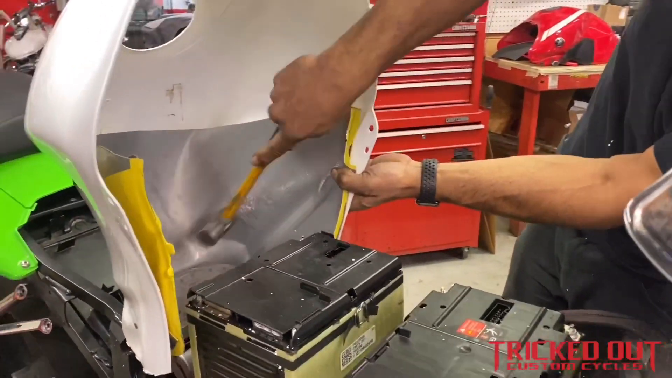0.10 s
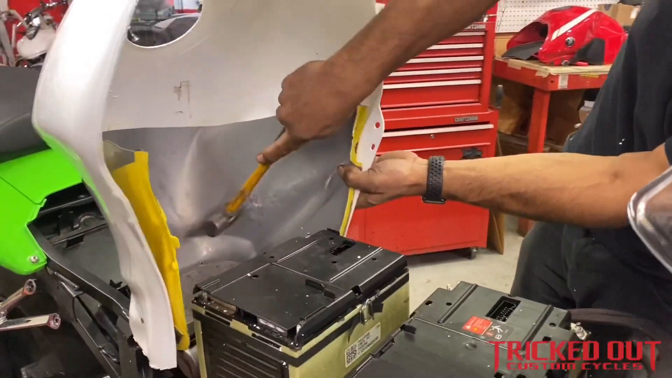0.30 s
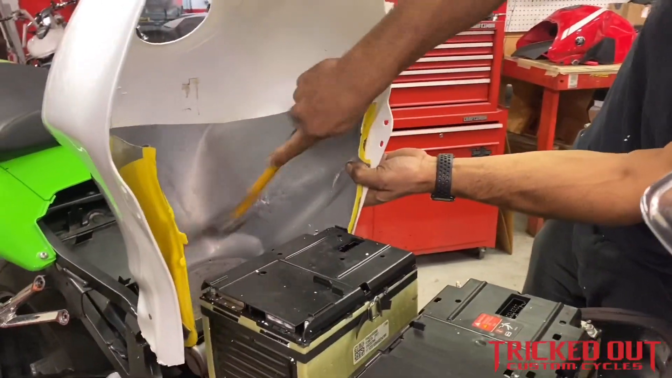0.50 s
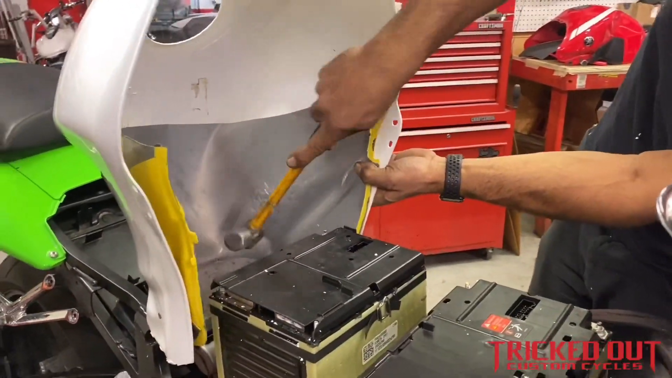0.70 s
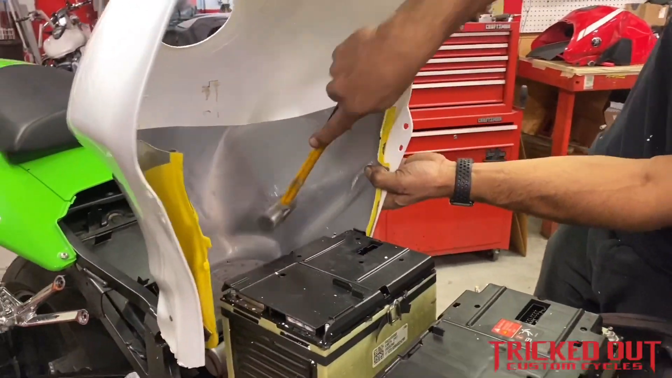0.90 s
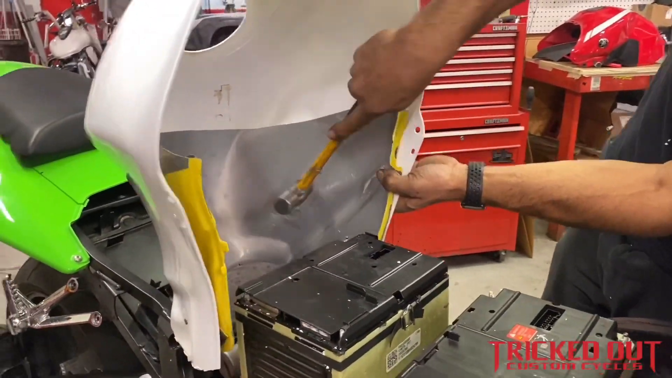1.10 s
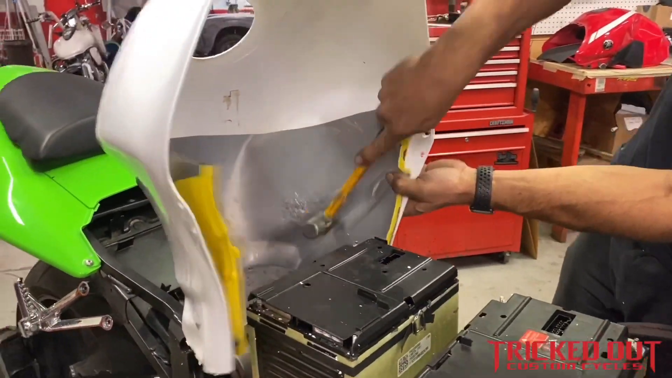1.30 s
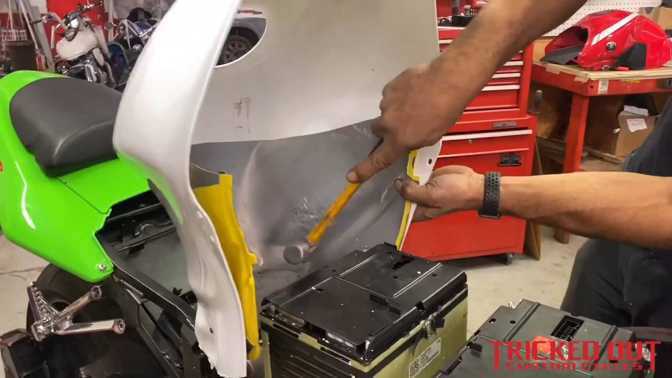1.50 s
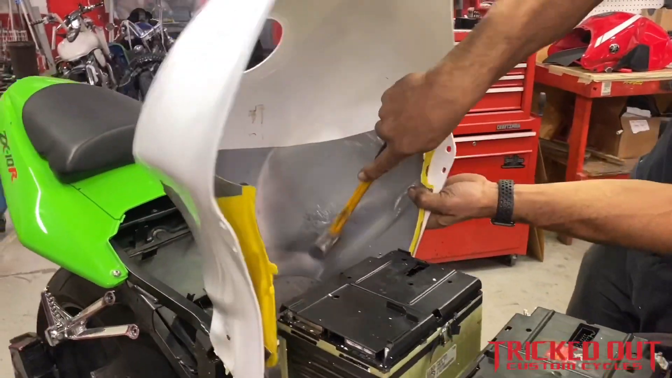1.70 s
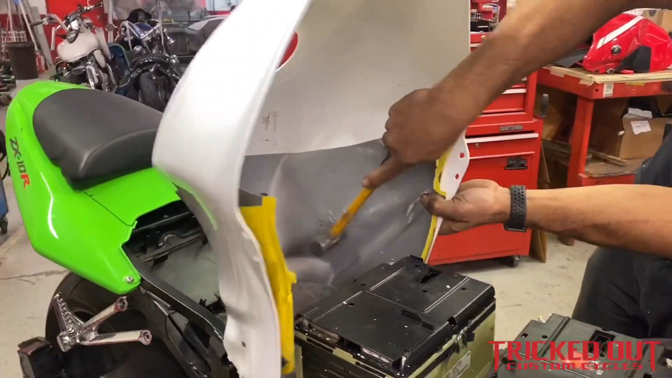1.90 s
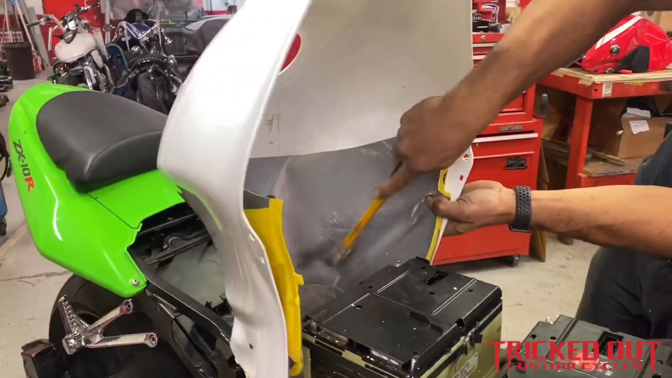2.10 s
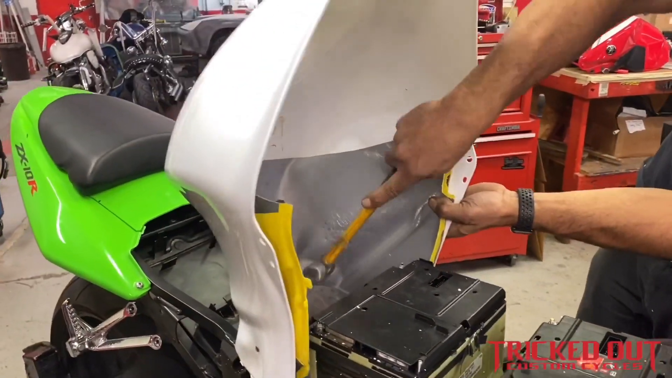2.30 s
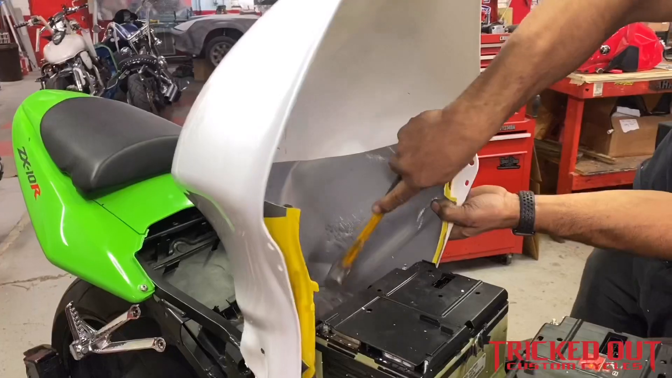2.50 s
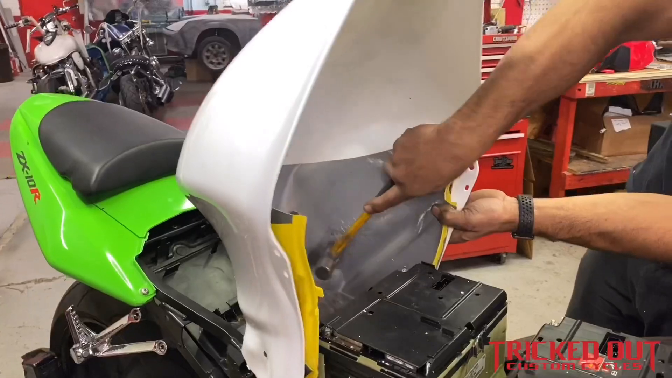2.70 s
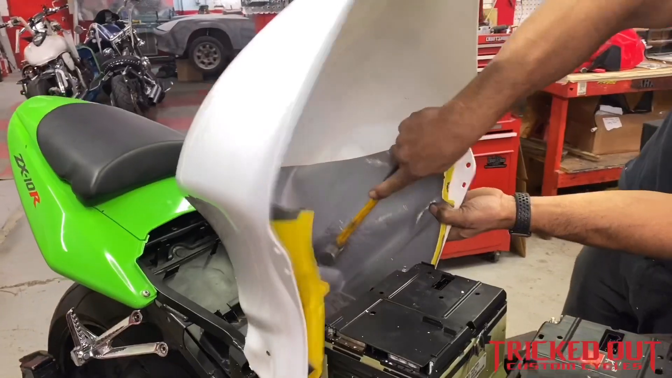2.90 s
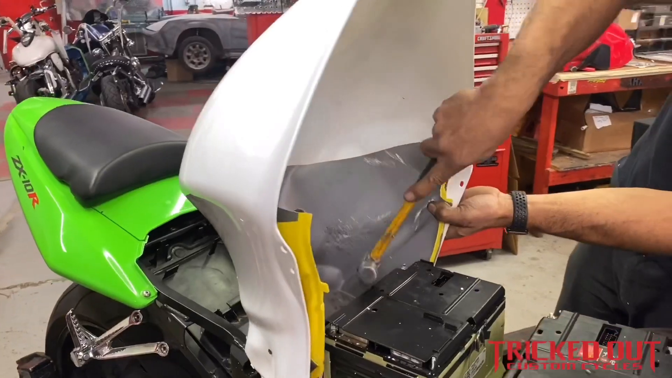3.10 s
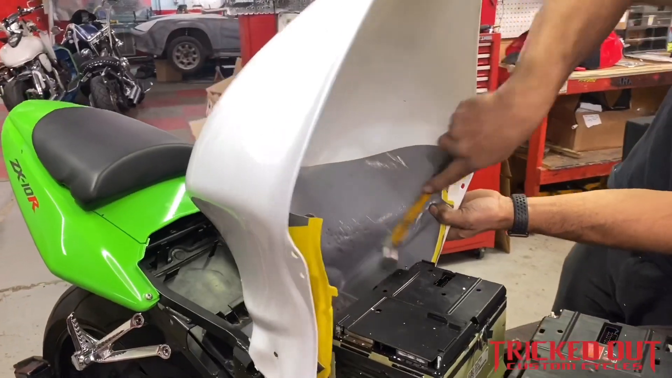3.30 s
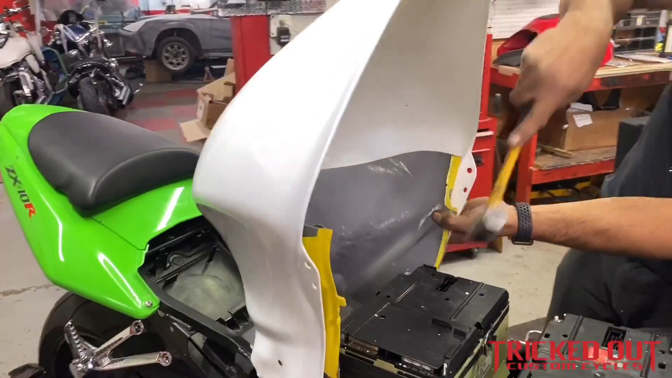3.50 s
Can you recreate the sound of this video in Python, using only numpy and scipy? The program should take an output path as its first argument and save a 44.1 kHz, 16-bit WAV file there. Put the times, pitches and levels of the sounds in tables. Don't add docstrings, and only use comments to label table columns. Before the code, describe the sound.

Rapid metallic hammer blows on a hollow metal panel, short dull clanks with a workshop tail

```python
import sys
import numpy as np
from scipy import signal
from scipy.fft import rfft, irfft, next_fast_len
from scipy.io import wavfile

SR = 44100
rng = np.random.default_rng(int(sys.argv[2]) if len(sys.argv) > 2 else 0)


def boost_factor(decibels):
    exponent = np.asarray(decibels, float) / 20
    return 10 ** exponent


def unload_audio(sound):
    columns = np.transpose(np.atleast_2d(sound))
    steps = np.round(np.clip(columns, -1, 1) * 32767)
    wavfile.write(sys.argv[1], SR, steps.astype(np.int16))


N = 154350
PRE_S = .3
FAVOUR_OCT = .28
RISE_S, BOOM_RISE_S = .0016, .0057


def read(table, hz, axis=1):
    rows = np.array(table, float)
    return np.interp(np.log(hz + 1), np.log(rows[:, 0] + 1), rows[:, axis])


def add(mix, s, sound):
    part = mix[..., round((s + PRE_S) * SR):][..., :sound.shape[-1]]
    part += sound[..., :part.shape[-1]]


def colour(x, gain):
    spectrum = rfft(x) * gain(np.fft.rfftfreq(x.shape[-1], 1 / SR))
    return irfft(spectrum, x.shape[-1])


def bump(hz, top_hz, octaves):
    return np.exp(-(np.log2((hz + 1) / top_hz) / octaves) ** 2)


def modes(hz, db, t60, t):
    decay = boost_factor(-60 * t / t60[:, None])
    shapes = decay * np.exp(2j * np.pi * hz[:, None] * t)
    return lambda weights: (weights * boost_factor(db) @ shapes).imag


def struck(count):
    draw = rng.standard_normal((2, count, 2))
    spread_db = 2
    return boost_factor(spread_db * draw[..., 0]) * np.exp(2j * draw[..., 1])


# pitch_hz, level_db
TICK_COLOUR = [(2500, -30), (5000, 2), (8000, -0.5), (12000, -5), (15200, 3), (15900, -20), (16600, -30.5),
               (17200, -69)]


def steel_tick(tick_db, t):
    noise = colour(rng.standard_normal((2, len(t))), lambda hz: boost_factor(read(TICK_COLOUR, hz)))
    snap = boost_factor(-60 * t / .015)
    sizzle = boost_factor(-7.5 - 60 * t / .061)
    rise = np.minimum(t / .00079, 1)
    return noise * boost_factor(5 + tick_db) * (snap + sizzle) * rise


# pitch_hz, level_db, decay_s (time to fall 60 dB)
SHELL_NOTES = [(607, 1, .09), (690, -2, .07), (803, -1, .07), (867, -2, .06), (996, -1, .06),
               (1070, -3, .06), (1135, -3, .06), (1335, -2, .06), (1440, -4, .06), (1810, -11, .05),
               (2120, -10, .05), (2365, -11, .05), (2680, -12, .045), (3230, -15, .045)]
# pitch_hz, level_db, decay_s
PANEL_OUTLINE = [(384, -16.5, 0.13), (583, -20.5, 0.073), (900, -13, 0.024), (1480, -11.5, 0.052),
                 (3460, -13, 0.058), (4800, -18.5, 0.041), (6600, -49.5, 0.015)]


def panel_notes(t):
    crowd_hz = np.sort(rng.uniform(np.sqrt(400), np.sqrt(7500), 220)) ** 2
    main_hz, main_db, main_t60 = np.transpose(SHELL_NOTES)
    hz = np.r_[main_hz, crowd_hz]
    db = np.r_[main_db, read(PANEL_OUTLINE, crowd_hz)]
    t60 = np.r_[main_t60, read(PANEL_OUTLINE, crowd_hz, axis=2)]
    longest_s = .065
    return hz, modes(hz, db, np.minimum(t60, longest_s), t)


def panel_clang(hz, panel, top_hz, favour_db, clang_hz, t):
    favour = boost_factor(favour_db * bump(hz, top_hz, FAVOUR_OCT) + 8 * bump(hz, clang_hz, .12))
    body = panel(struck(count=len(hz)) * favour) * (1 - np.exp(-(t / RISE_S) ** 2))
    first_10_ms = body[:, :SR // 100]
    return body * boost_factor(-10) / first_10_ms.std(axis=1, keepdims=True)


# pitch_hz, level_db, decay_s
BOOM_NOTES = [(75.4, -5.5, 0.31), (104.6, 5.5, 0.16), (144.5, 8.5, 0.067), (204.4, 0.5, 0.13),
              (233.7, 1, 0.13), (320.6, -1, 0.092)]


def shell_boom(boom_db, t):
    boom = modes(*np.transpose(BOOM_NOTES), t)
    rise = 1 - np.exp(-(t / BOOM_RISE_S) ** 3)
    return boom(struck(count=len(BOOM_NOTES)) ** .5) * boost_factor(2 + boom_db) * rise


def long_ring(s):
    t = np.arange(SR) / SR
    ring = np.sin(2 * np.pi * (291 * t + rng.random())) * (1 - np.exp(-t / BOOM_RISE_S))
    ring *= 1 + .416 * np.sin(2 * np.pi * (5 * t + rng.random()))
    sink_db_per_s, decay_s = -4, 1.0
    return ring * boost_factor(-31 + sink_db_per_s * s - 60 * t / decay_s)


# pitch_hz, level_db
SHELL_TO_ROOM = [(150, -9), (300, 19), (430, 17), (620, 26), (1300, 23), (3000, 16.5), (6000, 8.5),
                 (15300, -7)]


def click_to_room(top_hz, favour_db, tick_db):
    hz = np.fft.rfftfreq(1024, 1 / SR)
    db = read(SHELL_TO_ROOM, hz) + .45 * favour_db * bump(hz, top_hz, 2 * FAVOUR_OCT)
    usual_tick_db = -14
    db += (tick_db - usual_tick_db) * np.clip(hz / 8000, 0, 1)
    db -= np.maximum(hz - 15250, 0) / 20
    return np.roll(irfft(boost_factor(db)), 512) * np.hanning(1024)


# start_s, level_db, pitch_hz (favoured), boom_db, tick_db
BLOW_LIST = [(.202, -3, 900, -20.5, -14.5), (.476, -3.5, 900, -21.5, -13.5), (.731, -3.5, 580, -23, -13.5),
             (.997, -3, 1110, -21.5, -13.5), (1.262, -2.5, 565, -20, -12.5), (1.536, -4, 1410, -21, -12.5),
             (1.806, -3.5, 880, -22.5, -13), (2.075, -4.5, 1320, -23, -13), (2.326, -3, 1220, -23.5, -15),
             (2.594, -3, 1134, -20, -14), (2.849, -3, 880, -24.5, -15.5), (3.128, -5, 1274, -20.5, -9.5)]
# level_db, pitch_hz, boom_db, tick_db
BLOW_BEFORE = (-5, 892, -21.5, -11.5)
# favour_db (how far the favoured pitch stands out), clang_hz
STRIKING_SPOTS = [(6, 3000), (10, 3700), (11.5, 3000), (5, 2800), (0, 2650), (1.5, 5000), (0.5, 2970),
                  (7, 1900), (4.5, 1990), (6, 2950), (4, 2400), (9, 6500), (3, 2000)]
EARLIER_S = -.065
TAILS = 3


def hammer():
    fields = np.zeros((1 + TAILS, 2, N + round(PRE_S * SR)))
    t = np.arange(round(.3 * SR)) / SR
    hz, panel = panel_notes(t)
    blows = [(EARLIER_S, *BLOW_BEFORE)] + list(BLOW_LIST)
    for k, (s, db, top_hz, boom_db, tick_db) in enumerate(blows):
        out, send = fields[0], fields[1 + k % TAILS]
        favour_db, clang_hz = STRIKING_SPOTS[k]
        body = panel_clang(hz, panel, top_hz, favour_db, clang_hz, t)
        low = shell_boom(boom_db, t)
        add(out, s - .001, boost_factor(db) * (body + steel_tick(tick_db, t)))
        add(send, s, boost_factor(db - 10) * body)
        click = click_to_room(top_hz, favour_db, tick_db)
        add(send, s - 512 / SR, boost_factor(db) * click)
        for mix in (out, send):
            add(mix, s + .004, boost_factor(db) * low)
        add(out, s, long_ring(s))
    low_cut = signal.butter(2, 96, "high", fs=SR, output="sos")
    return signal.sosfilt(low_cut, fields)


# pitch_hz, decay_s, level_db
ROOM_DECAY = [(60, 0.63, -24), (287, 0.61, 4.5), (926, 0.41, 2.5), (2860, 0.57, -4), (7960, 0.43, -2),
              (14700, 0.27, 0.5)]


def workshop(x):
    taps = np.zeros((2, SR))
    at = np.arange(0, SR - 6, 6) + rng.integers(0, 6, (2, (SR - 1) // 6))
    np.put_along_axis(taps, at, rng.choice([-1., 1.], at.shape), 1)
    hz, t, z = signal.stft(taps, SR, nperseg=256)
    t60 = read(ROOM_DECAY, hz)[:, None]
    level_db = read(ROOM_DECAY, hz, axis=2)[:, None]
    even_energy = np.sqrt(12 * np.log(1000) / (t60 * SR))
    z = z * boost_factor(level_db - 60 * t / t60) * even_energy
    cavity = 1 + boost_factor(2.5 - 60 * t / .18)
    z = z * cavity * boost_factor([[[0]], [[1.5]]])
    delay = round(.003 * SR)
    tail = np.pad(signal.istft(z, SR, nperseg=256)[1], ((0, 0), (delay, 0)))
    return signal.fftconvolve(x, tail, axes=1)[:, :x.shape[1]]


# pitch_hz, level_db
AIR_COLOUR = [(30, -12), (300, -23.5), (1000, -21), (4400, -25.5), (9000, -45), (16000, -53)]


def room_air():
    x = colour(rng.standard_normal((2, N)), lambda hz: boost_factor(read(AIR_COLOUR, hz)))
    return boost_factor(-63) * x / x.std()


# start_s, level_db, pitch_hz
FRAME_THUMPS = [
    (0.999, -26, 50),
    (1.265, -26.5, 55),
]


def frame_thumps(out):
    t = np.arange(SR) / SR
    for s, db, thump_hz in FRAME_THUMPS:
        rise = 1 - np.exp(-t / BOOM_RISE_S)
        add(out, s, np.sin(2 * np.pi * thump_hz * t) * boost_factor(db - 60 * t / .45) * rise)


def scene():
    direct, *sends = hammer()
    frame_thumps(direct)
    tails = sum(workshop(send) for send in sends)
    return (direct + tails)[:, -N:] + room_air()


def top_cut(x):
    return signal.sosfilt(signal.butter(12, 16820, fs=SR, output="sos"), x)


# pitch_hz, likeness (0 to 1), right_minus_left_db, right_lead_rad
PORT_PAIR = [(60, .99, -1, 0), (300, .95, -.5, -.3), (1000, .86, -2, -.3), (2100, .68, -1.5, -.4),
             (3200, .8, -.5, -1.3), (3900, .45, -3, -.3), (5000, .65, -4.5, -.2), (6300, .7, -3, 0),
             (8500, .8, 1.5, 0), (14000, .92, 1.5, 0)]
# start_s, left_db (the right loses as much)
LEFT_TURN = [(0, 1.3), (1.2, .7), (3.5, 0.47)]


def record(dry):
    size = next_fast_len(N + SR)
    hz, (a, b) = np.fft.rfftfreq(size, 1 / SR), rfft(dry, size, axis=1)
    same = np.clip(read(PORT_PAIR, hz), 0, 1)
    lead = read(PORT_PAIR, hz, axis=3)
    lead += 2 * np.pi * np.maximum(hz - 6350, 0) / 3780
    right = same * a + np.sqrt(1 - same ** 2) * b
    right = right * boost_factor(read(PORT_PAIR, hz, axis=2)) * np.exp(1j * lead)
    turn = boost_factor(np.interp(np.arange(N) / SR, *np.transpose(LEFT_TURN)))
    pair = np.array([dry[0] * turn, irfft(right, size)[:N] / turn])
    ceiling, edge_hz = 1.15, 16300
    pair = pair / (1 + (pair / ceiling) ** 4) ** .25
    pair = signal.oaconvolve(pair, signal.firwin(127, edge_hz, fs=SR)[None], "same")
    return top_cut(np.clip(pair, -1, 1))


dry = scene()
out = record(dry)
unload_audio(out)
```